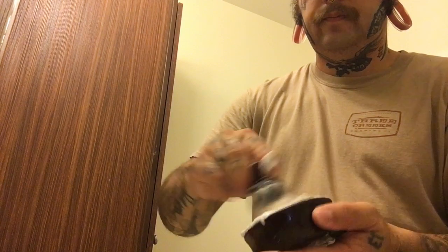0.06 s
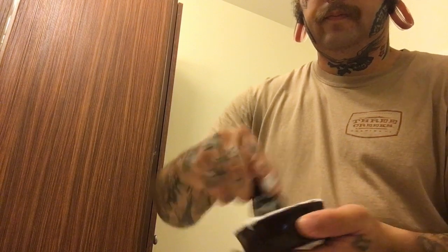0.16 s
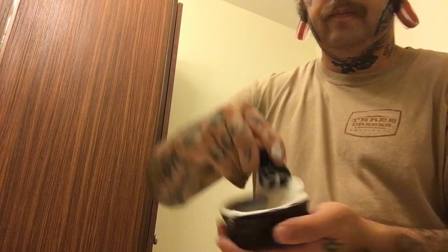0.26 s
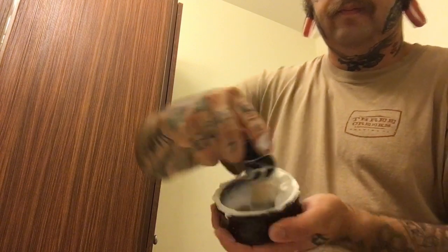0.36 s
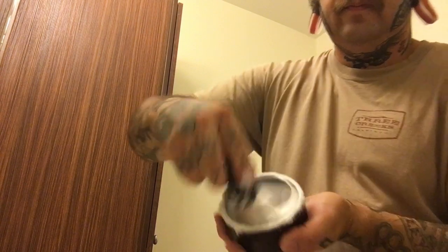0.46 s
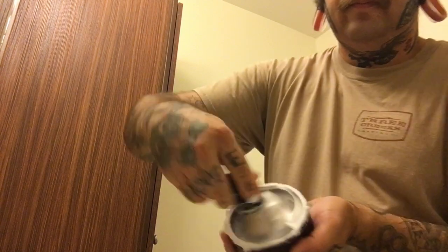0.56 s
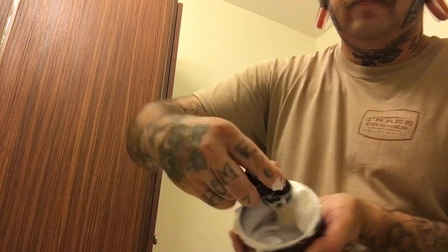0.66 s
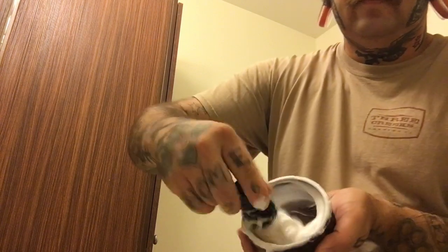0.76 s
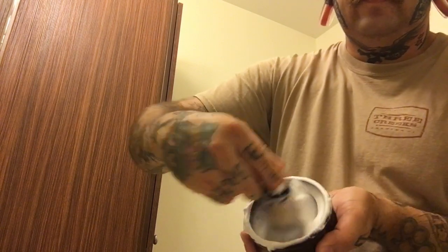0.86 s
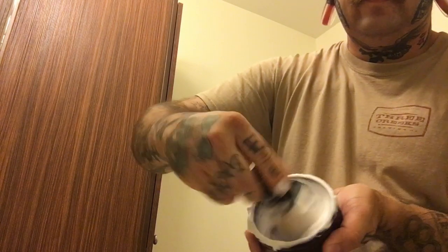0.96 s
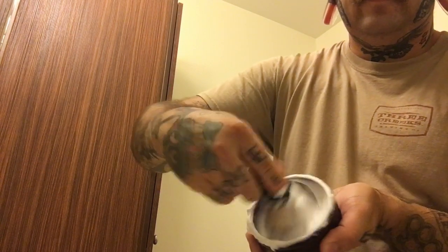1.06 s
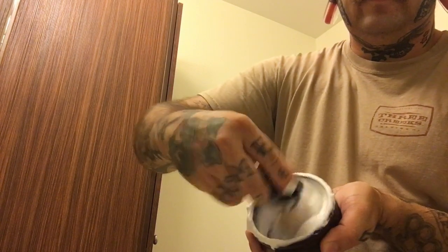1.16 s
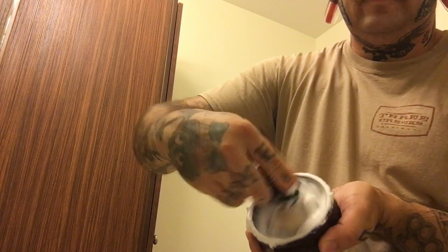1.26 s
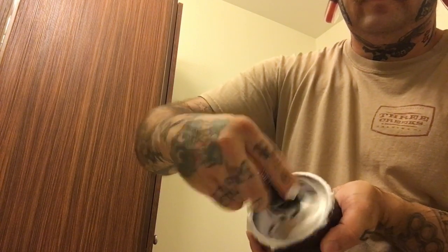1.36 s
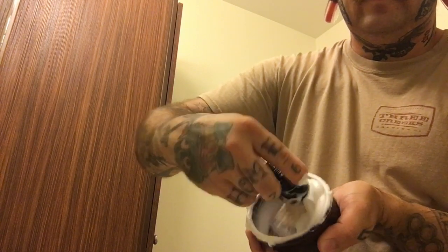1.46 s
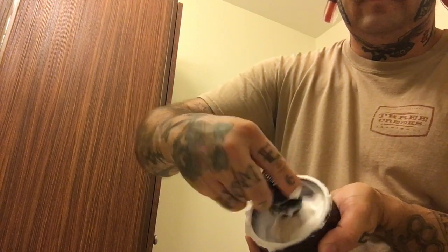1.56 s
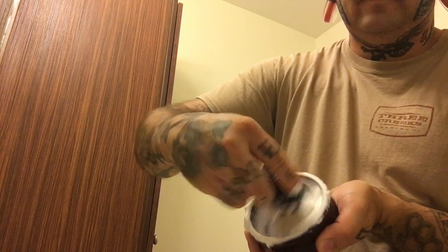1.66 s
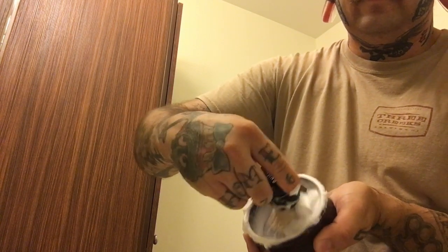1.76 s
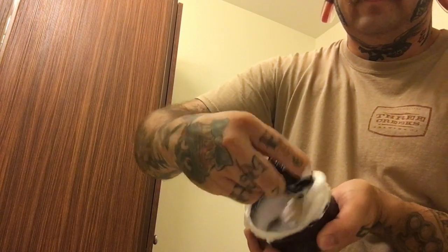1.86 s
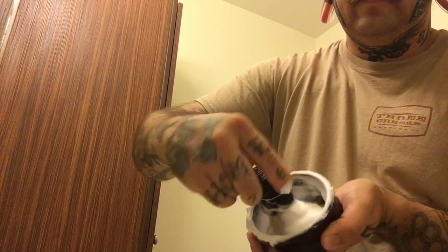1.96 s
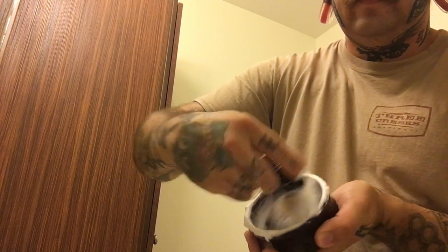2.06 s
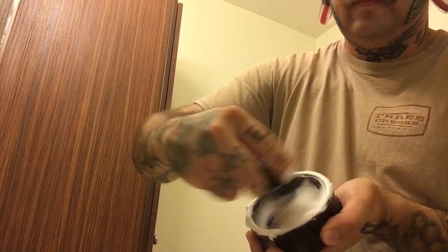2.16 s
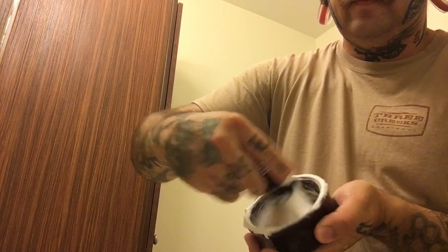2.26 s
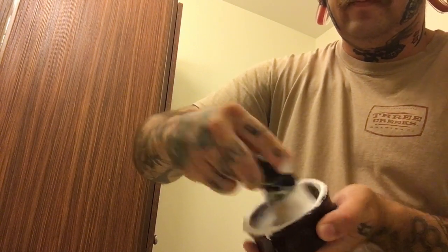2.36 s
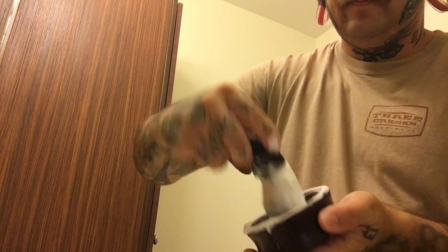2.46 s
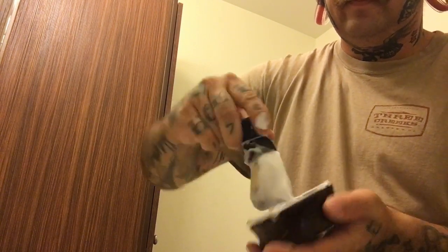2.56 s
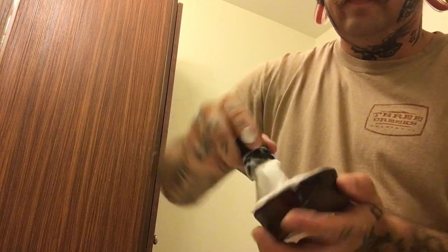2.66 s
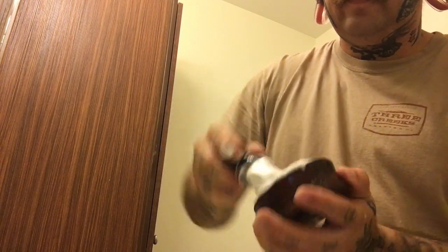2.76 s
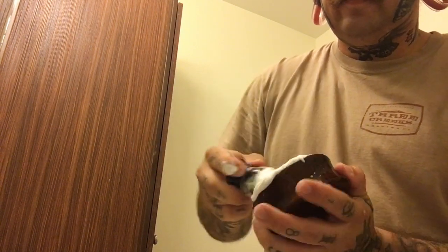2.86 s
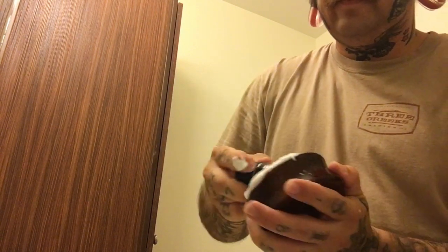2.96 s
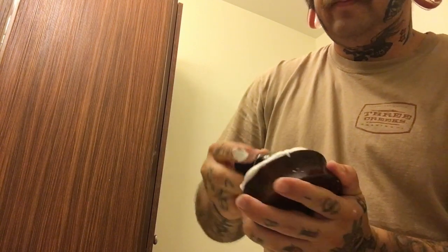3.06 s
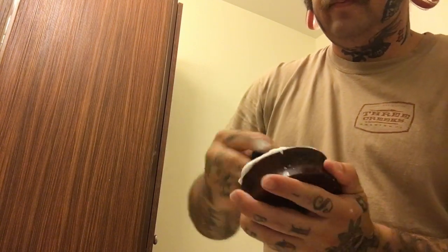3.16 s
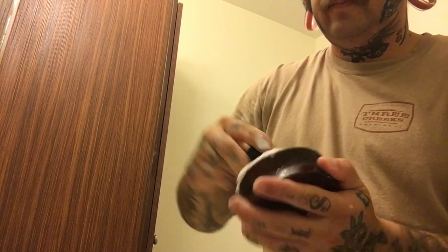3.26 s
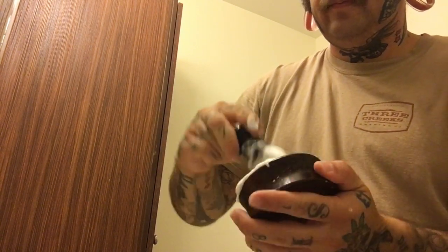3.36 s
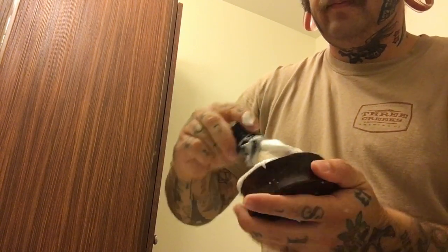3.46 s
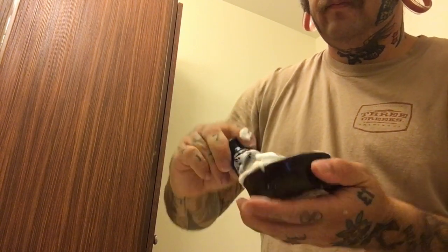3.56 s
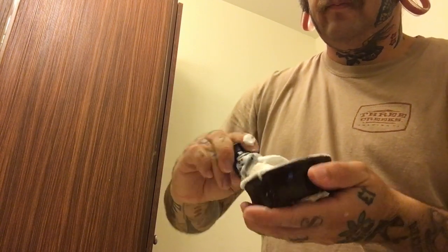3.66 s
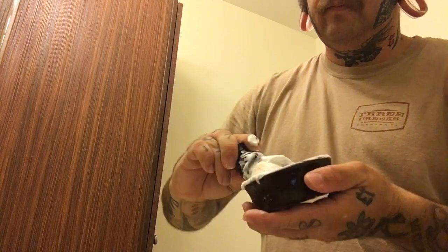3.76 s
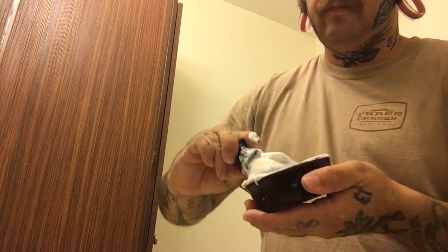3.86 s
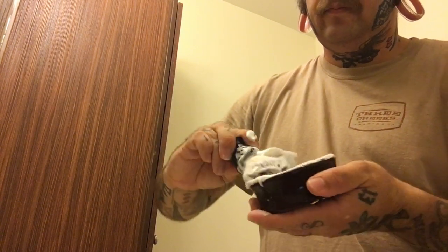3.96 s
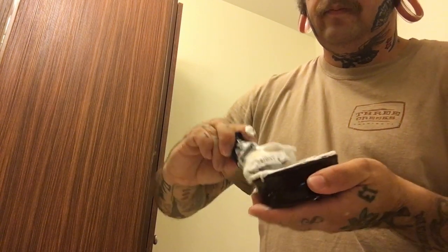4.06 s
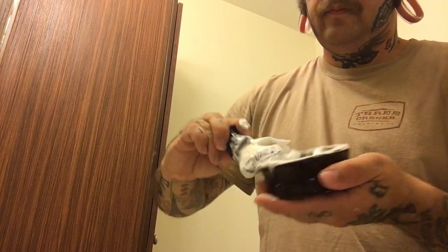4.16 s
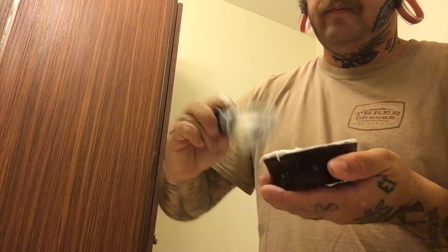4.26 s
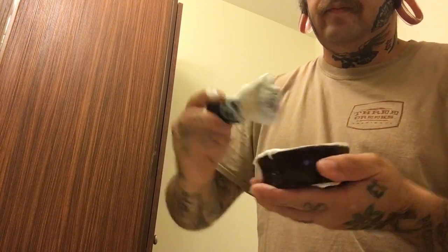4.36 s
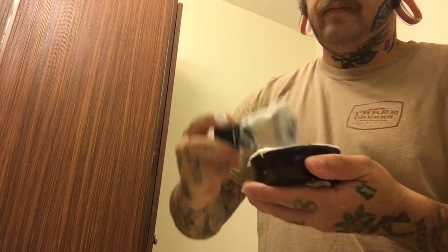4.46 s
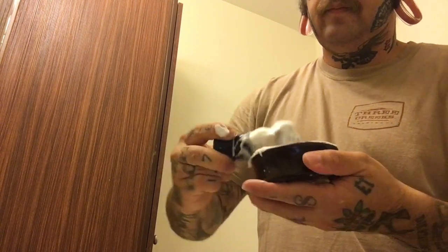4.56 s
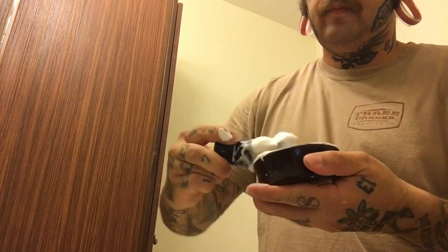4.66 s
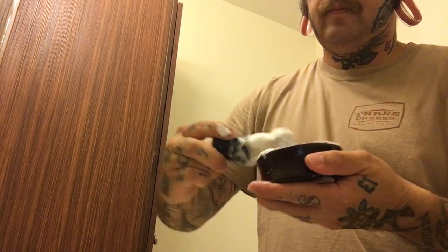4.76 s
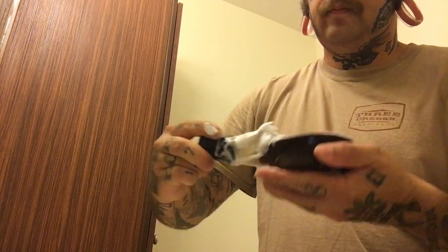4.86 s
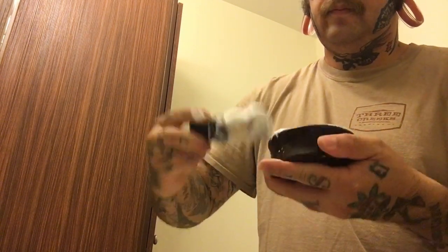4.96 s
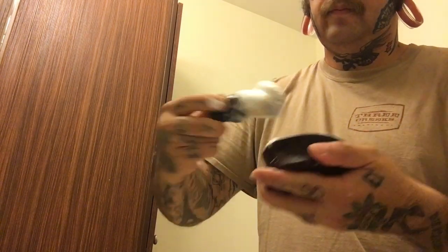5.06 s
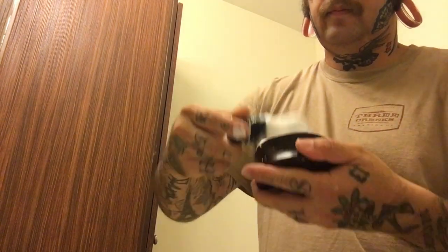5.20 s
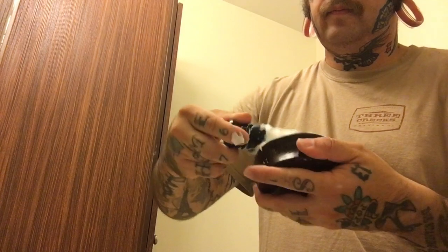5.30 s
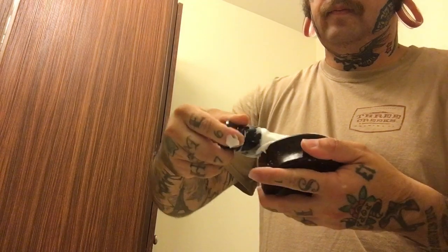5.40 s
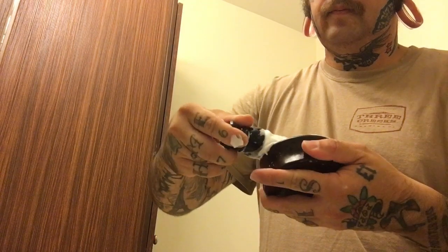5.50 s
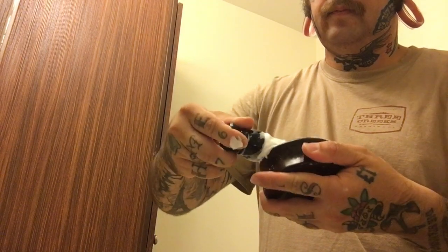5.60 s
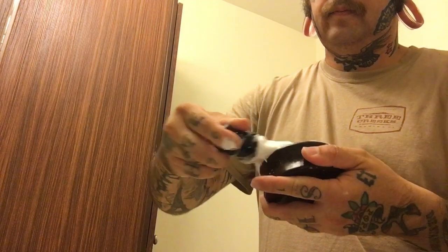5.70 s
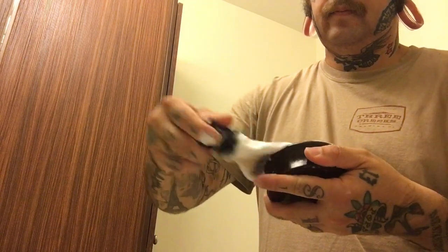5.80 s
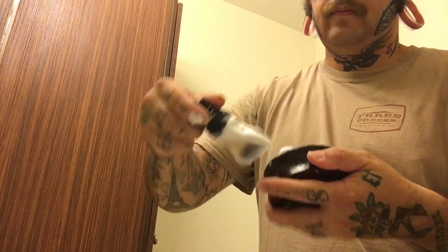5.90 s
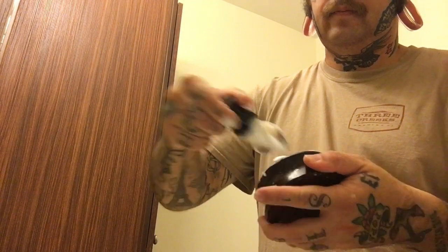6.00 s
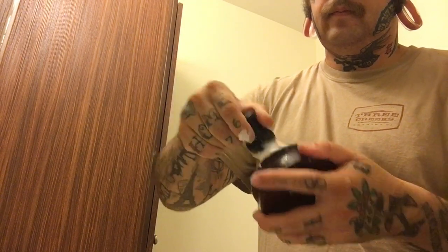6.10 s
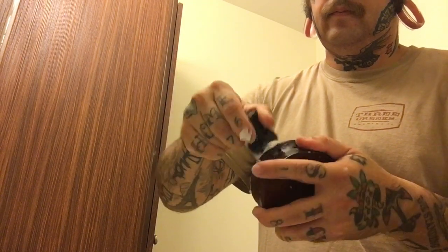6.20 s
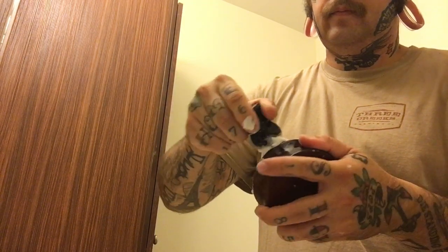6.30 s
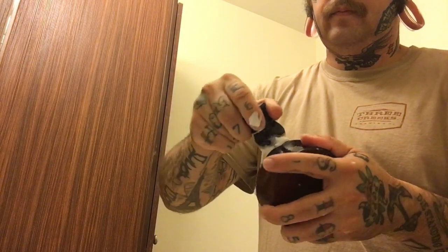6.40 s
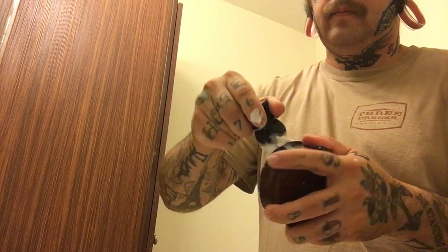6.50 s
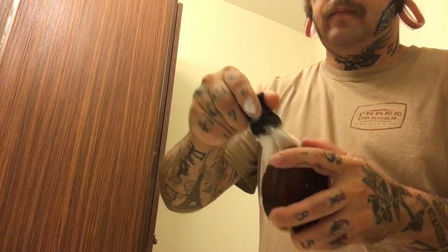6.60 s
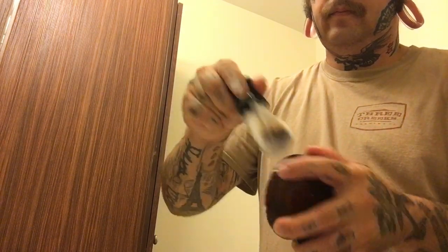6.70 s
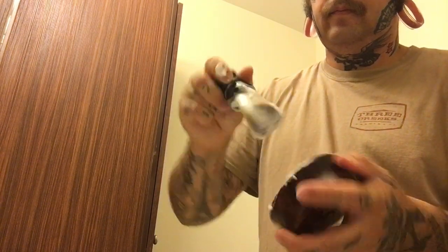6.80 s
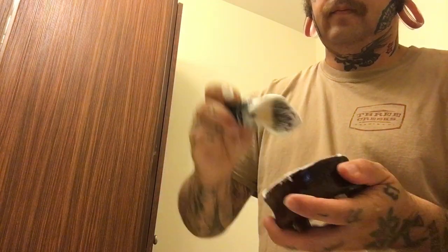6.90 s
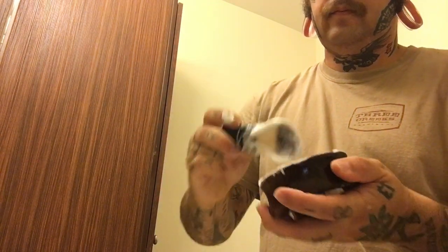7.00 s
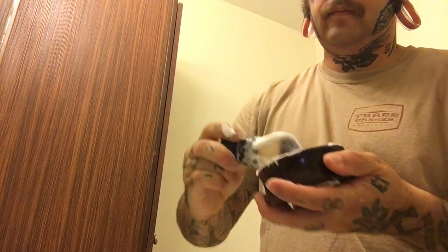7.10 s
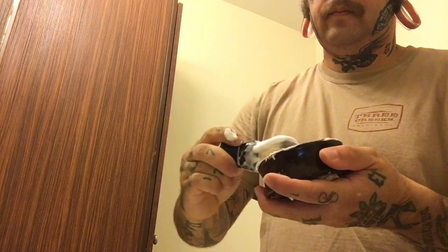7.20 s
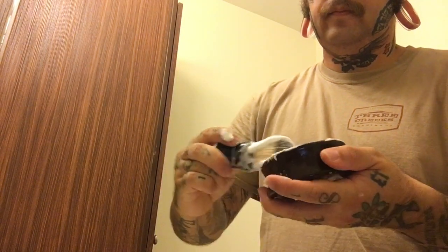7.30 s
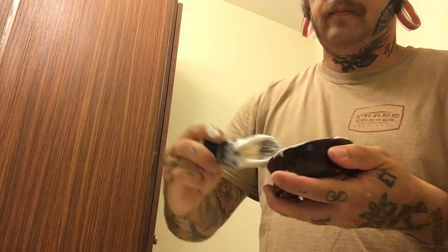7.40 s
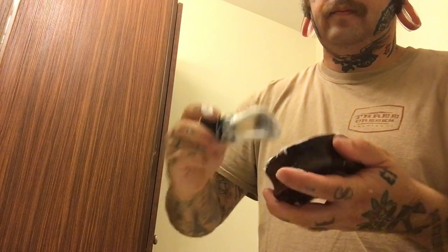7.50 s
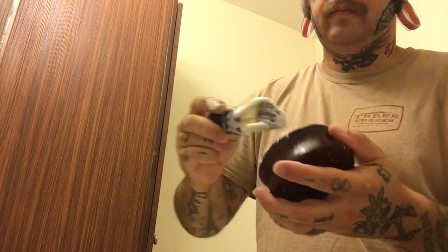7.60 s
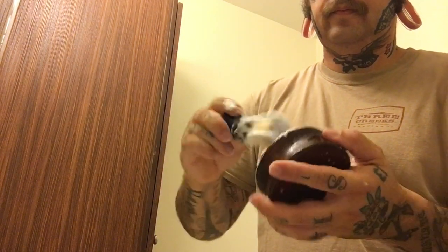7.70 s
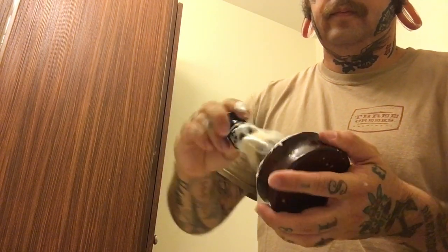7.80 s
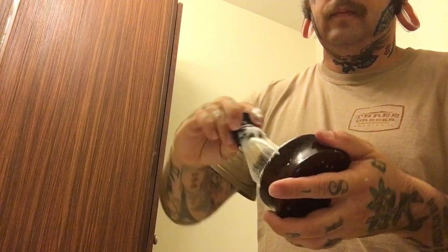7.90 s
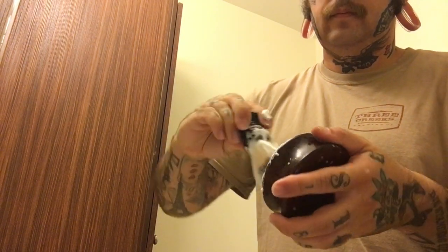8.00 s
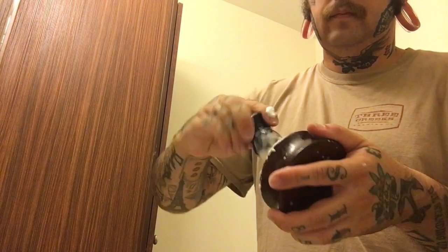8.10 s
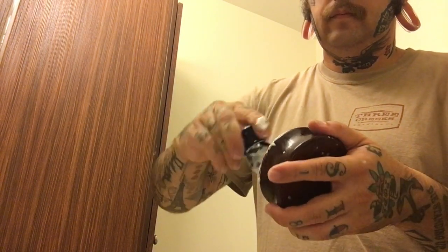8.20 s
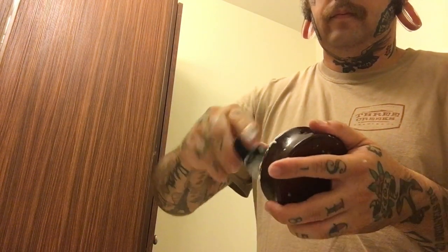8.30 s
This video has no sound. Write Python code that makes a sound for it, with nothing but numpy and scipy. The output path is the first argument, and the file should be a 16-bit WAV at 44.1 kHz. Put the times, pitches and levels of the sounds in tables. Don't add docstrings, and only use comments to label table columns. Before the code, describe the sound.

A wet brush swishes lather round a small wooden bowl with light knocks, then scrapes and strikes the rim in four loud hollow knocks, room ringing.

```python
import sys
import numpy as np
from scipy import signal
from scipy.fft import rfft, irfft, next_fast_len
from scipy.io import wavfile
from scipy.ndimage import uniform_filter1d, map_coordinates

SR = 44100
rng = np.random.default_rng(int(sys.argv[2]) if len(sys.argv) > 2 else 0)


def unload_audio(sound):
    columns = np.transpose(np.atleast_2d(sound))
    steps = np.round(np.clip(columns, -1, 1) * 32767)
    wavfile.write(sys.argv[1], SR, steps.astype(np.int16))


def invert_db(x):
    u = np.asarray(x, float) / 20
    return 10 ** u


N = 368144

# start_s, peak_db, hardness_db, room_db, snap_db
KNOCKS = [
    (.179, -29, -13.5, -7, -37),
    (.591, -14, -7.5, -4, -31),
    (.877, -19, -12.5, -4, -42),
    (1.132, -12, -17.5, -4.5, -44),
    (3.6756, -5, -29.5, -6, -35.5),
    (4.633, -4, -23, -0.5, -38.5),
    (5.3343, -3, -19.5, 1, -36.5),
    (6.276, -3.5, -21.5, -4.5, -44),
    (7.26, -22, -25.5, -3.5, -45),
]
# pitch_hz, width_hz, level_db
BOWL_RINGS = [
    [(1060, 240, -7.5), (1700, 170, -3.5), (2330, 130, -15)],
    [(957, 130, -12.5), (1400, 230, -2), (1660, 194, 1), (2385, 150, -9)],
    [(857, 120, -13), (1400, 290, 2), (1594, 180, 6), (2270, 110, -12)],
    [(1176, 64, 0), (1427, 180, -6), (1640, 100, -5.5), (2990, 320, -13.5)],
]
# pitch_hz, width_hz, level_db
RIM_RINGS = [
    [(740, 170, -10.5), (1080, 350, -1), (1330, 120, 6.5), (1705, 160, 2.5), (2210, 410, -7),
     (3200, 180, -12)],
    [(640, 50, -18.5), (1090, 250, -3.5), (1386, 120, 4.5), (1753, 270, -2), (2076, 77, 3.5),
     (2340, 180, -6)],
    [(735, 93, -15.5), (1150, 140, -1), (1400, 130, 1), (1780, 170, -2.5), (2234, 210, -2),
     (2900, 200, -11)],
    [(670, 200, -23), (1080, 110, -1.5), (1400, 290, -7.5), (1820, 180, -4.5), (2260, 350, -10.5),
     (2890, 500, -17)],
    [(850, 330, -6), (1060, 373, 2), (1310, 440, -2), (2240, 230, -12.5)],
]
# pitch_hz, width_hz, level_db
UPPER_RINGS = [
    [(3230, 500, -4), (4500, 600, 11), (6360, 1500, -14.5)],
    [(2880, 280, 0.5), (4070, 460, -5), (5120, 320, -9), (6500, 310, -7.5)],
    [(3020, 430, -2), (4100, 600, -6), (5500, 800, -14.5)],
    [(3890, 250, -3), (4490, 350, -4), (5400, 600, -8.5), (7180, 2100, -11)],
    [(3420, 600, -15.5), (4040, 350, 1.5), (4600, 400, -3), (5850, 450, 0.5), (7540, 800, -12.5)],
    [(3110, 120, 5.5), (4100, 250, 1.5), (4600, 520, -2), (5657, 430, 0), (7150, 2400, -8)],
    [(3103, 180, 5), (4190, 410, 0.5), (5180, 370, -1.5), (6095, 400, -3), (7250, 1400, -10.5)],
    [(3570, 490, -1), (4220, 370, 1), (5860, 440, -7.5), (7600, 900, -22)],
    [(3100, 730, -8), (4200, 500, -12), (5950, 500, -4)],
]
# pitch_hz, width_hz, level_db
HOLLOW = [(218, 150, -9), (370, 190, 5.5)]
THUD_DB, THUD_PER_DB = -32.5, -0.55

# peak_s, rise_s, fall_s, scrub_db, fizz_db
STIR = [(.005, .05, 0.062, -54, -61), (.12, .06, 0.17, -50.5, -76.5), (.215, 0.067, .07, -56, -60),
        (.426, .008, 0.055, -64, -74.5), (.52, 0.16, 0.13, -53, -69.5), (.69, 0.07, 0.14, -55, -69.5),
        (.792, 0.07, 0.065, -49.5, -60), (.95, 0.24, 0.033, -53.5, -79), (1.065, 0.056, 0.038, -44, -57),
        (1.285, 0.086, 0.057, -50.5, -61.5), (1.35, .05, 0.037, -52, -65), (1.452, 0.067, 0.087, -48, -65),
        (1.5, 0.063, 0.038, -54, -62.5), (1.612, 0.089, 0.066, -52.5, -66.5),
        (1.68, 0.035, .03, -55.5, -68.5), (1.77, .04, 0.059, -47, -63), (1.9, 0.076, 0.18, -55, -72),
        (2.0, 0.022, 0.079, -55, -71), (2.065, 0.096, 0.085, -48, -62), (2.135, 0.044, 0.055, -54, -64),
        (2.265, 0.091, 0.19, -47, -62), (2.36, 0.11, .08, -57, -80), (2.485, 0.21, 0.024, -50.5, -68.5),
        (2.6, .1, 0.12, -81, -75)]
# peak_s, rise_s, fall_s, scrub_db, fizz_db
SCRAPE = [
    (2.758, 0.0093, 0.069, -68.5, -72),
    (2.914, 0.0032, .14, -52.5, -68),
    (2.975, 0.028, .04, -56, -68),
    (3.1, 0.16, 0.11, -54, -72.5),
    (3.29, 0.14, .05, -60.5, -72),
    (3.39, 0.087, 0.054, -59.5, -74),
    (3.458, .006, 0.043, -66.5, -74.5),
]
# peak_s, rise_s, fall_s, scrub_db, fizz_db
WIPE = [(3.8, .1, .15, -74, -76), (3.99, .06, .1, -61, -64.5), (4.07, 0.11, .05, -54, -68),
        (4.23, .1, .08, -58.5, -67), (4.29, .05, .07, -71, -70.5), (4.93, 0.11, 0.1, -52, -59.5),
        (5.62, .2, 0.18, -72, -70.5), (5.79, 0.017, 0.033, -53.5, -80), (5.865, 0.09, 0.063, -52.5, -60.5),
        (6.45, .15, 0.17, -74.5, -71.5), (6.62, 0.15, 0.13, -62.5, -74), (6.705, 0.14, 0.078, -57, -64.5),
        (6.785, 0.087, 0.019, -81, -70.5), (7.0, 0.099, 0.081, -78, -79.5), (7.33, .02, 0.07, -61, -75),
        (7.44, .1, 0.073, -57, -65.5), (8.292, .03, 0.054, -71, -80)]
# pitch_hz, width_hz, level_db
FULL_BOWL = [(1080, 540, -5), (1620, 410, 1.5), (3050, 710, -4.5), (4550, 560, -11.5), (5900, 990, -20.5)]
# pitch_hz, width_hz, level_db
TILTED_BOWL = [(1250, 400, 1.5), (2100, 600, -3), (3000, 900, -6.5)]
# pitch_hz, width_hz, level_db
OPEN_BOWL = [(1200, 320, 0.5), (2200, 1000, -6), (2960, 1300, -7.5)]
# pitch_hz, level_db_per_hz
FOAM = [(1470, -21), (2500, -9.5), (2720, -15.5), (3060, -6.5), (4110, -3), (4910, -4.5), (5970, -2),
        (6810, -4), (10600, -12.5), (14700, -13.5), (16000, -21.5)]
# scrub_db, fizz_db
RESTING_DB = [-81.5, -85.5]
FADE_DB = 12

# start_s, peak_db, pitch_hz
TICKS = [(0.424, -42, 1620), (0.764, -36, 1400), (0.846, -46, 1500), (1.06, -73, 1640), (2.18, -34.5, 1690),
         (2.199, -35.5, 1640), (2.239, -37.5, 1600), (2.254, -35, 1810), (2.467, -42, 1720),
         (2.916, -55, 1320), (2.952, -39.5, 1330), (3.293, -38, 1250), (3.375, -41.5, 1550),
         (3.399, -41, 1150), (3.456, -50, 1060), (4.175, -49.5, 1080), (6.652, -41.5, 1187),
         (7.247, -42, 1540), (.808, -39, 906), (1.151, -28, 1200), (3.108, -46.5, 1745), (7.325, -60, 3300)]
# peak_s, rise_s, fall_s, level_db
SQUEAK = [
    (2.635, .14, .02, -76),
]
SQUEAK_HZ, SQUEAK_GLIDE_HZ_PER_S = 4550, 500

# pitch_hz, t60_s
ROOM = [(250, 0.98), (660, 0.93), (1200, 0.55), (2300, 0.57), (3000, 0.46), (4500, 0.47), (7000, 0.41),
        (12000, 0.32)]
# pitch_hz, level_db
WALLS = [(250, 0.5), (450, 6.5), (800, 2.5), (1150, 0.5), (1650, -6.5), (2350, 3), (2700, -2.5), (3300, 1),
         (4500, 3), (9000, 2), (14000, 0)]
# pitch_hz, level_db, t60_s
STANDING = [(203, -19.5, 0.66), (320, -20, 0.72), (388.3, -22.5, 0.92), (452.5, -16.5, 0.25),
            (726, -17, 0.19), (1105, -21, 0.5)]

# pitch_hz, level_db_per_hz
AIR = [(26, -34.5), (38, -4.5), (65, -7), (88, -16), (122, -8.5), (257, -19), (323, -13.5), (376, -20),
       (428, -18), (677, -26.5), (749, -25), (851, -30.5), (5210, -41), (16000, -55.5)]
AIR_DB = -61.5
MAINS_ON_S, MAINS_RISE_S = 2.2, 0.52
MAINS_DB, MAINS_IDLE_DB, SECOND_DB = -61, -78.5, -75
MOTOR_DB, MOTOR_FADE_DB_PER_S = -72, 1
# peak_s, rise_s, fall_s, level_db
PIPE = [
    (4.5, .45, 0.23, -69),
    (5.1, .3, 0.41, -71),
    (6.75, .25, 0.88, -72),
    (7.5, .3, 0.17, -59.5),
]
PIPE_HZ = 436


def knocks():
    out, lead, t = np.zeros(N + SR), round(.023 * SR), np.arange(SR) / SR
    for knock, ring, stiff in zip(KNOCKS, BOWL_RINGS + RIM_RINGS, UPPER_RINGS):
        start_s, peak_db, hard_db, room_db, snap_db = knock
        body = filtered(push(0.00022), lambda hz: modes(ring)(hz) * soft(hz, 750, 2400))
        thud = filtered(push(0.00053), modes(HOLLOW))
        crack = filtered(push(0.000092), lambda hz: modes(stiff)(hz) * soft(hz, 2700, 9000))
        burst = rng.standard_normal(SR) * invert_db(-60 * t / 0.017)
        snap = filtered(burst, lambda hz: soft(hz, 5000, 9000) * soft(hz, 3000, 12000))
        thud_db = THUD_DB + THUD_PER_DB * peak_db
        parts = [(body, 0), (thud, thud_db), (crack, hard_db), (snap, snap_db)]
        blow = invert_db(peak_db) * sum(invert_db(part_db) * part / abs(part).max() for part, part_db in parts)
        start = round(start_s * SR)
        out[start:][:SR] += blow + invert_db(room_db) * echo(blow, gap=0.0018)
        lead_in = unit(filtered(rng.standard_normal(lead), modes(ring)))
        lead_in *= invert_db(-5 * np.sin(np.pi * t[:lead] / t[lead]))
        out[start - lead:][:lead] += invert_db(peak_db - 51.5) * lead_in
    return out[:N]


def push(contact_s):
    t = np.arange(SR) / SR
    return np.sin(np.pi * np.clip(t / contact_s, 0, 1)) ** 2


def modes(table):
    def response(f):
        total = 0
        for k, (centre, width, db) in enumerate(table):
            resonance = 1j * f * width / (centre * centre - f * f + 1j * f * width)
            total = total + (-1) ** k * invert_db(db) * resonance
        return total
    return response


def soft(hz, low_hz, high_hz):
    return 1 / (1 + low_hz / (1j * hz + 1e-9)) ** 2 / (1 + 1j * hz / high_hz) ** 2


def stroke(rows, bowl):
    scrub_gain, fizz_gain = swells(rows) + invert_db(RESTING_DB)[:, None] / 3
    slips = patchy(grit(spiky_db=3.5, share=0.69), depth_db=2.35)
    scrub = filtered(slips, lambda hz: modes(bowl)(hz) * soft(hz, 650, 4500))
    bubbles = patchy(grit(spiky_db=7.0, share=0.3), depth_db=2.5)
    fizz = filtered(bubbles, lambda hz: invert_db(along(FOAM, hz)))
    return scrub_gain * invert_db(-2) * unit(scrub) + fizz_gain * unit(fizz)


def grit(spiky_db, share):
    size_db = spiky_db * np.minimum(rng.exponential(size=N), 4)
    size_db += 3.0 * wobble(69) + 1.4 * wobble(400)
    spikes = unit(rng.standard_normal(N) * invert_db(size_db))
    return np.sqrt(share) * spikes + np.sqrt(1 - share) * rng.standard_normal(N)


def patchy(x, depth_db):
    z = signal.stft(x, nperseg=256)[2]
    field = uniform_filter1d(rng.standard_normal(z.shape), size=4, axis=0)
    field = uniform_filter1d(field, size=6, axis=1)
    return signal.istft(z * invert_db(depth_db * unit(field)), nperseg=256)[1][:N]


def swells(rows):
    t, power = np.arange(N) / SR, 0
    for peak_s, rise_s, fall_s, *db in rows:
        away = np.maximum((peak_s - t) / rise_s, (t - peak_s) / fall_s)
        power = power + invert_db(2 * np.array(db))[:, None] * invert_db(-2 * FADE_DB * away)
    return np.sqrt(power)


def ticks():
    out, t = np.zeros(N + SR), np.arange(SR // 20) / SR
    for start_s, peak_db, hz in TICKS:
        ring = np.sin(2 * np.pi * hz * t) + invert_db(-12.5) * np.sin(2 * np.pi * 1.864 * hz * t)
        ring *= invert_db(-60 * t / .012) * (1 - np.exp(-t / 0.00035))
        click = invert_db(-19 - 60 * t / .003) * rng.standard_normal(len(t))
        out[round(start_s * SR):][:len(t)] += invert_db(peak_db) * (ring + click)
    return out[:N]


def squeak():
    hz = SQUEAK_HZ + SQUEAK_GLIDE_HZ_PER_S * (np.arange(N) / SR - SQUEAK[0][0])
    return swells(SQUEAK)[0] * tone(hz, 0, 3.3, rate=40)


def echo(x, gap):
    hz, frames, z = signal.stft(rng.standard_normal(SR), SR, nperseg=256)
    decay = invert_db(-60 * frames / along(ROOM, hz)[:, None])
    tail = signal.istft(z * decay, SR, nperseg=256)[1][:SR]
    t = np.arange(SR) / SR
    for mode_hz, db, t60 in STANDING:
        tail += invert_db(db + rng.normal(0, 0.52) - 60 * t / t60) * np.sin(2 * np.pi * mode_hz * t)
    tail *= 1 + 0.49 * invert_db(-60 * t / .22)
    tail *= np.clip(t / gap, 0, 1) ** 2
    tail = filtered(tail / np.linalg.norm(tail), lambda hz: invert_db(along(WALLS, hz)))
    return signal.fftconvolve(x, tail)[:len(x)]


def house():
    air = unit(filtered(rng.standard_normal(N), lambda hz: invert_db(along(AIR, hz))))
    t = np.arange(N) / SR
    switched_on = np.clip((t - MAINS_ON_S) / MAINS_RISE_S, 0, 1)
    mains_db = MAINS_IDLE_DB + (MAINS_DB - MAINS_IDLE_DB) * switched_on
    hum = tone(np.full(N, 59.3), mains_db, 1.5, rate=4.0)
    hum += tone(np.full(N, 118.6), SECOND_DB, 2, rate=4.7)
    motor = tone(np.full(N, 203.), MOTOR_DB - MOTOR_FADE_DB_PER_S * t, 2.5, rate=4.2)
    pipe = swells(PIPE)[0] * tone(np.full(N, PIPE_HZ), 0, 2.3, rate=1.7)
    return invert_db(AIR_DB - 2) * air + hum + motor + pipe


def tone(hz, db, unsteady_db, rate):
    level = np.sqrt(2) * invert_db(db + unsteady_db * wobble(rate))
    return level * np.sin(2 * np.pi * np.cumsum(hz) / SR + 0.36 * wobble(rate))


def wobble(rate):
    knots = rng.standard_normal(int(N * rate / SR) + 4)
    return map_coordinates(knots, [np.arange(N) * rate / SR])


def filtered(x, response):
    m = next_fast_len(len(x) + 8192)
    return irfft(rfft(x, m) * response(np.fft.rfftfreq(m, 1 / SR)), m)[:len(x)]


def along(points, hz):
    f, v = np.transpose(points)
    return np.interp(np.log(hz + 1), np.log(f + 1), v)


def unit(x):
    return x / np.sqrt(np.mean(x ** 2) + 1e-20)


def scene():
    brush = stroke(STIR, FULL_BOWL) + stroke(SCRAPE, TILTED_BOWL) + stroke(WIPE, OPEN_BOWL)
    brush += ticks() + squeak()
    return (knocks() + brush + invert_db(-8) * echo(brush, gap=0.0019) + house())[None]


def top_cut(x):
    return signal.sosfilt(signal.butter(12, 15780, fs=SR, output="sos"), x)


def record(dry):
    mix = filtered(dry[0], lambda hz: soft(hz, 36, 90000))[None]
    return top_cut(mix)


dry = scene()
out = record(dry)
unload_audio(out)
```